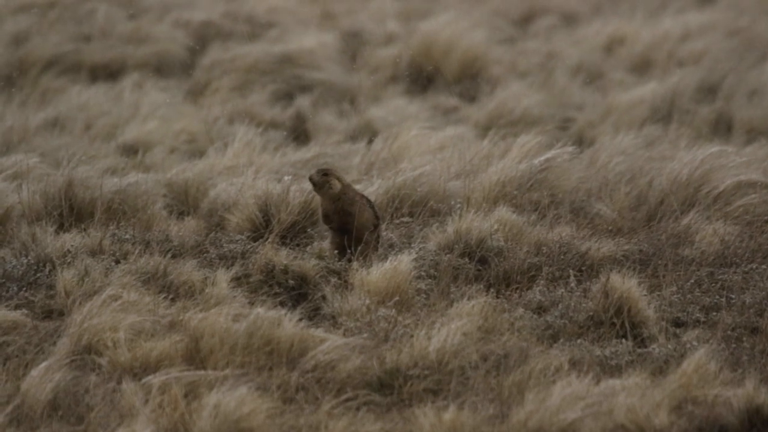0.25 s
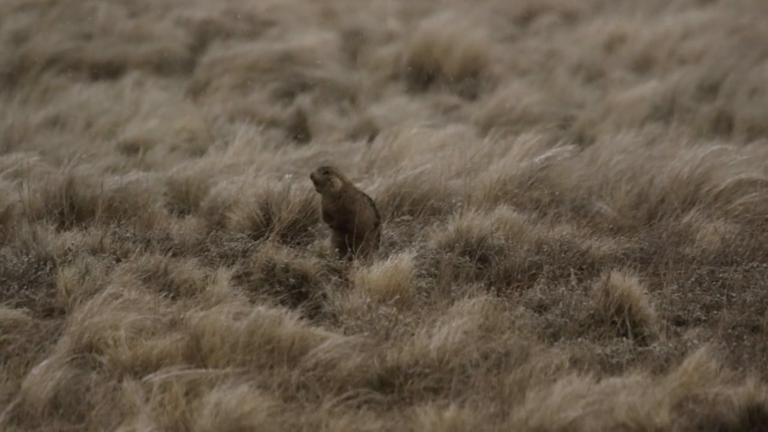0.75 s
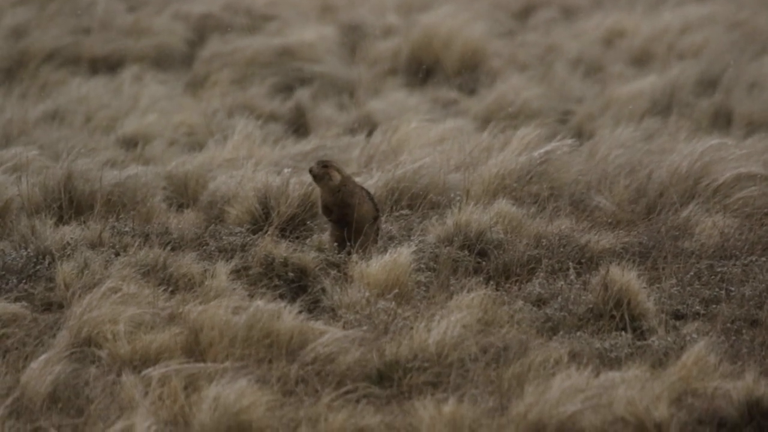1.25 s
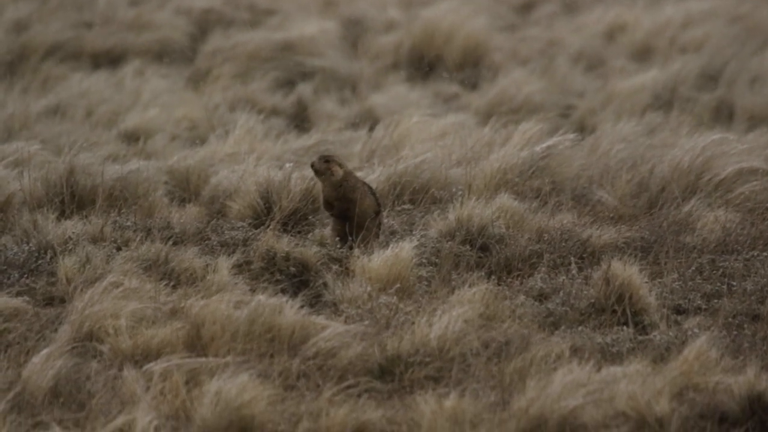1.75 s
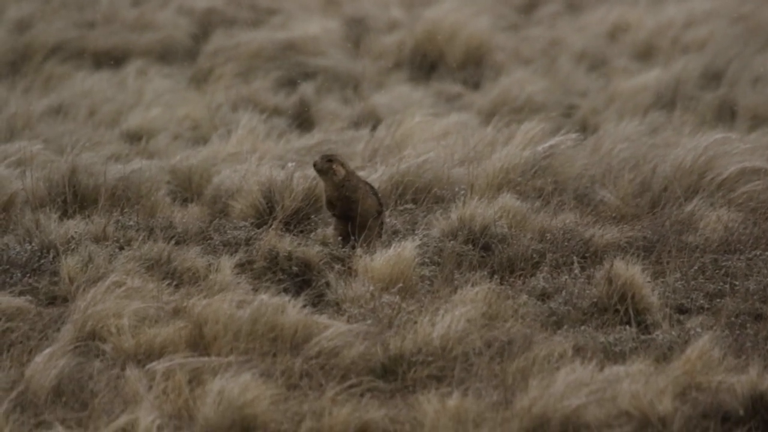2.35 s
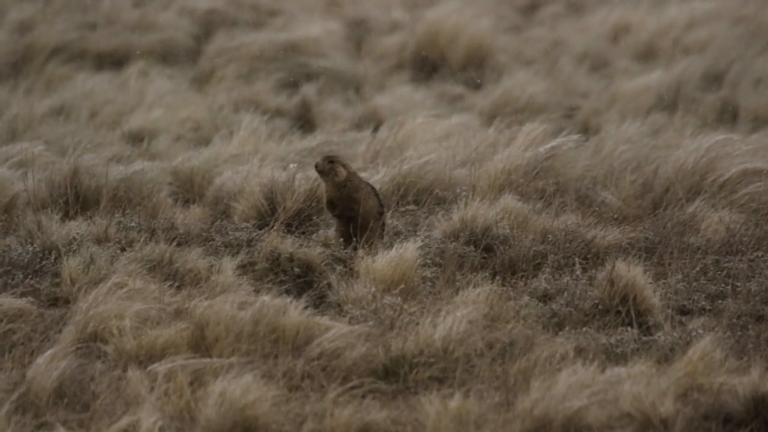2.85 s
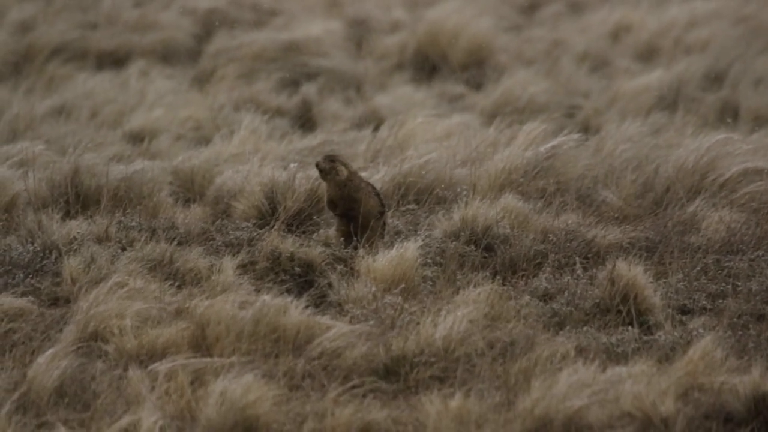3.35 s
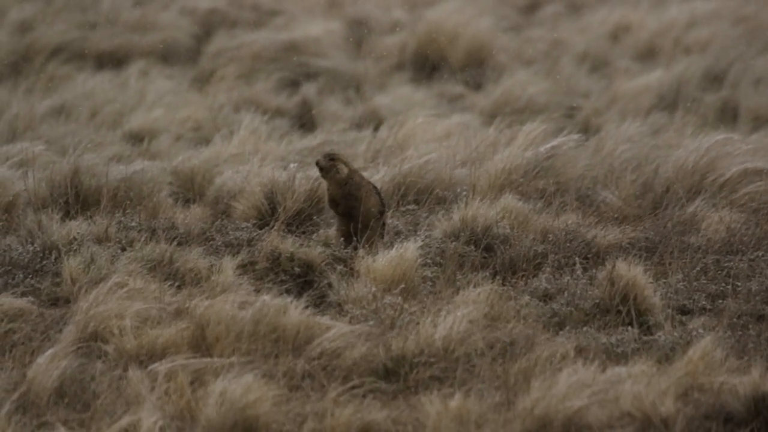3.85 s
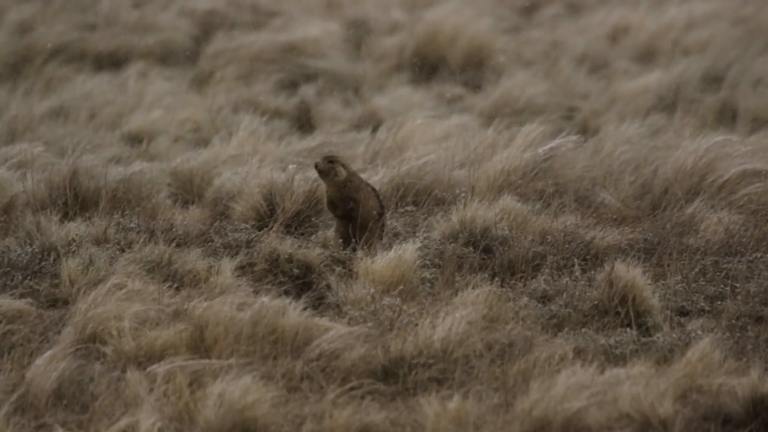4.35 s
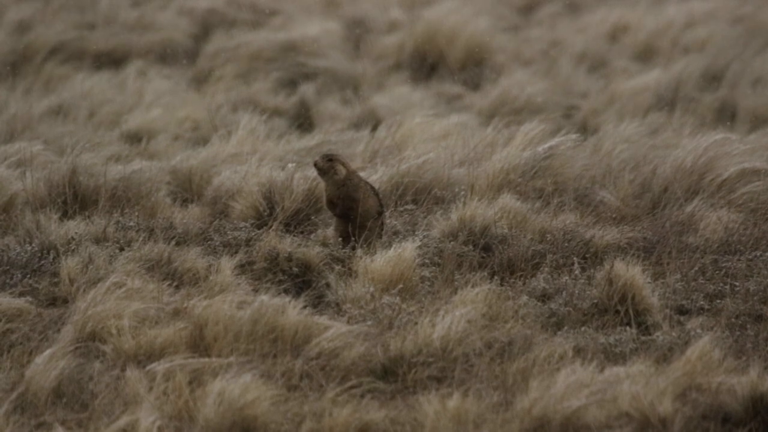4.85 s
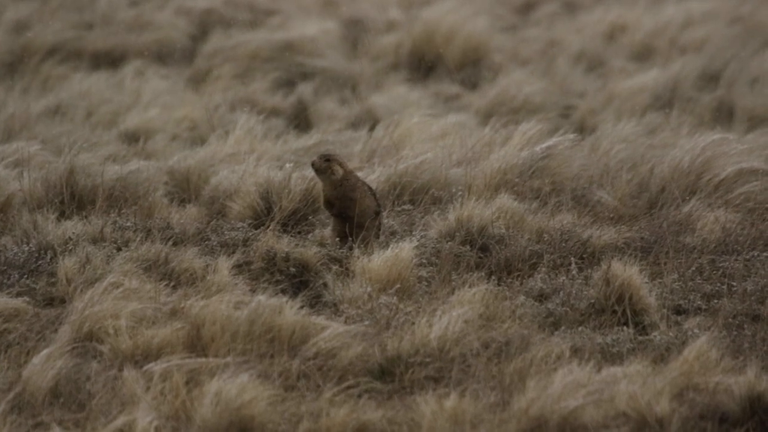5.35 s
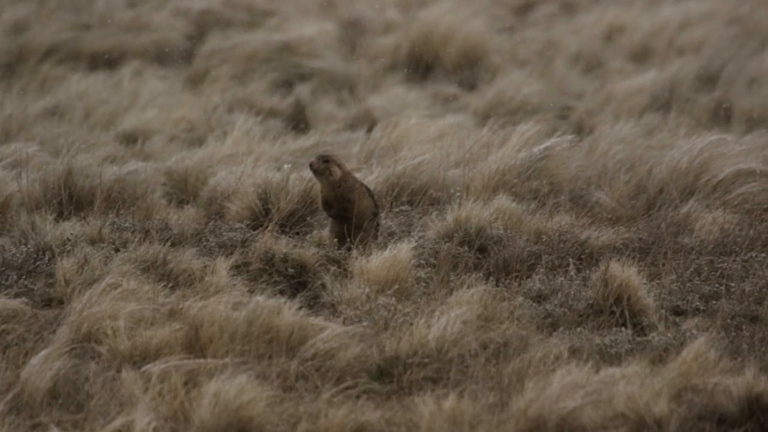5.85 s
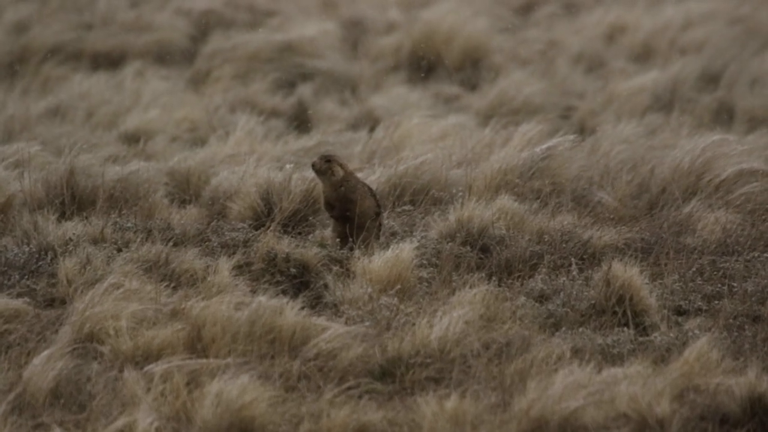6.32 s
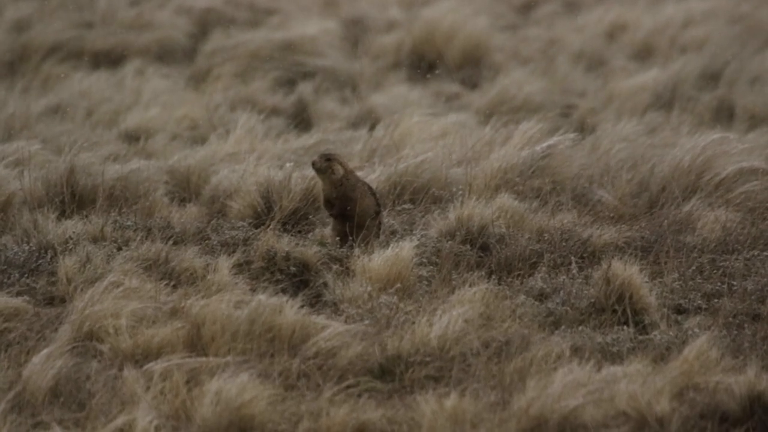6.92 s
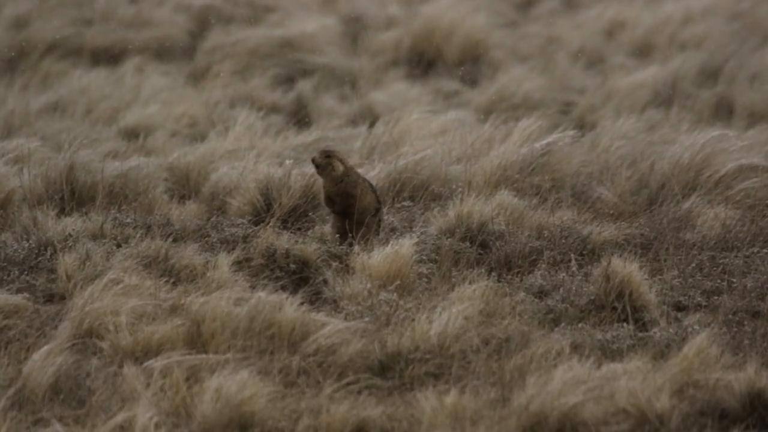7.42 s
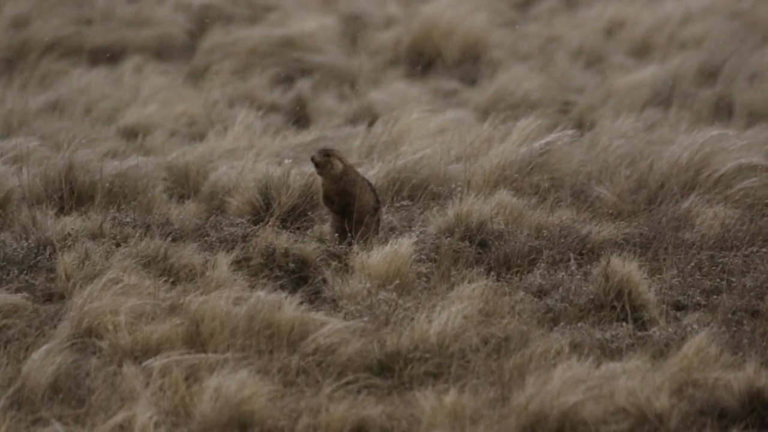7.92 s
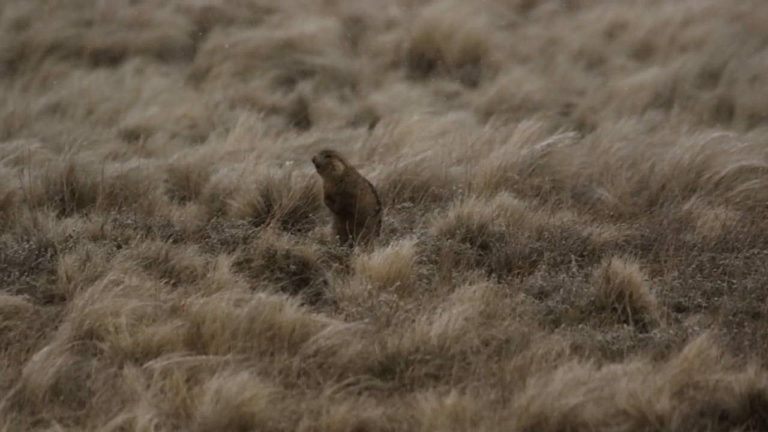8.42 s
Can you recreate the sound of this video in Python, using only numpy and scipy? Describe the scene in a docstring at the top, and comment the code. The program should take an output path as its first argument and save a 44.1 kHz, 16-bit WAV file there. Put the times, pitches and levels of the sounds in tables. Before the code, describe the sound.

Outdoor field microphone at some distance from a barking prairie dog. Each yip is bright and clipped, arching quickly up and down, with a short grassy scatter and a dull faint echo from far ground. Three bouts are split by calm gaps of air rush, weak wind thumps and distant low drone. Crisp straw crackle and snapping stems come mainly near the start, swelling after the first bout.

```python
"""Open grassland: a prairie dog barks in three bouts, each bark a short arch of pitch with a hard start.
Barks are sums of harmonics shaped by throat and mouth; the tussocks scatter them, far ground echoes them.
Nearby, stalks snap and dry grass crackles: short bursts of noise and coloured ticks, stronger in gusts.
Behind are light wind bumping the microphone and a rush of air (shaped noise), a faint whistle
at the start (a wavering sine tone), and the drone of a distant engine (narrow bands of noise)."""
import sys
import numpy as np
from scipy import signal
from scipy.fft import rfft, irfft, next_fast_len
from scipy.io import wavfile
from scipy.ndimage import uniform_filter1d, map_coordinates

SR = 44100
rng = np.random.default_rng(int(sys.argv[2]) if len(sys.argv) > 2 else 0)


def bounce(signal):
    """Save signal as a 16-bit WAV file at the path given by the first command-line argument."""
    frames = np.transpose(np.atleast_2d(signal))
    limited = np.clip(frames, -1, 1)
    pcm = np.round(limited * 32767).astype(np.int16)
    wavfile.write(sys.argv[1], SR, pcm)


N = 382788  # length of the scene [samples]


def amp(db):
    """Turn decibels into a plain multiplier."""
    return 10 ** (np.asarray(db) / 20)


def unit(x):
    """Scale a sound to an average (rms) strength of 1."""
    return x / np.sqrt(np.mean(x ** 2) + 1e-20)


def along(points, hz):
    """Read (frequency [Hz], value) points at any frequency, on a log axis."""
    point_hz, values = np.transpose(points)
    return np.interp(np.log(hz + 1), np.log(point_hz + 1), values)


def curve(rows):
    """Join (time [s], value) rows into one value per sample."""
    return np.interp(np.arange(N) / SR, *np.transpose(rows))


def wobble(rate, size=N):
    """A smooth random curve with the given number of random points a second."""
    knots = rng.standard_normal(int(size * rate / SR) + 4)
    return map_coordinates(knots, [np.arange(size) * rate / SR])


def filtered(x, response):
    """Multiply the frequencies of x by a response."""
    padded = next_fast_len(len(x) + 8192)
    gain = response(np.fft.rfftfreq(padded, 1 / SR))
    return irfft(rfft(x, padded) * gain, padded)[:len(x)]


def coloured(x, spectrum):
    """Shape x by a table of (frequency [Hz], level [dB])."""
    return filtered(x, lambda hz: amp(along(spectrum, hz)))


def noise(spectrum):
    """Random hiss of rms 1 with a given colour."""
    return unit(coloured(rng.standard_normal(N), spectrum))


def add(track, start, sound):
    """Mix a sound into the track at a start time [s]."""
    part = track[max(round(start * SR), 0):][:len(sound)]
    part += sound[:len(part)]


# every bark: (start [s], length [s], held pitch [Hz], attack level [dB], middle level [dB]),
# with levels before the throat and mouth colour it
BARKS = [(0.204, 0.094, 1006, -18, -24.5), (0.5432, 0.093, 1000, -19, -29), (0.8836, .094, 997, -19, -29.5),
         (1.225, 0.093, 978, -20, -25), (1.614, 0.087, 958, -20, -23.5), (3.499, 0.092, 992, -20, -26),
         (3.8844, 0.092, 1007, -20.5, -29.5), (4.2473, .095, 981, -21, -25.5),
         (4.6725, 0.087, 954, -23, -24.5), (5.0638, 0.085, 952, -22.5, -25),
         (7.2929, 0.097, 989, -19.5, -26.5), (7.686, .104, 1031, -19.5, -22.5),
         (8.0654, 0.1, 1023, -19, -24.5), (8.4226, 0.1, 1001, -19, -25)]


def prairie_dog():
    """All barks, scattered by the grass and followed by an echo from far ground."""
    track = np.zeros(N)
    for start, *shape in BARKS:
        add(track, start, scattered(bark(*shape)))
    return track + far_echo(track)


# the throat's fixed colour: (frequency [Hz], level [dB])
THROAT = [(700, -52), (1000, -39), (1500, -40), (1950, -15.5), (2500, -6.5), (4000, -5.3), (4600, -13.5),
          (5800, -18), (6750, -33), (8000, -24.5), (9000, -28), (10000, -41), (11200, -38), (14500, -51)]
# how much of the sag after the attack each region takes: (frequency [Hz], share [1 = all of it])
SAG_SHARE = [(2000, 0.6), (2900, 1.32), (4000, 1.31), (5200, 0.33), (8000, 0.19), (11000, 0.81)]
# the course of every bark: (share of its length [0 to 1], effort [dB],
# mouth resonance at the easy pitch [Hz])
GESTURE = [(0, -13.5, 2750), (.06, -6, 3100), (.14, -1.5, 3500), (.22, -1.5, 3060), (.32, -1, 2730),
           (.8, -2.5, 2910), (0.899, -7.5, 2620), (1, -11.5, 2170)]
SCOOP_S = .015  # time the pitch takes to scoop up [s]
# a bark pitched above the easy pitch sinks while held; one below it creeps up
EASY_HZ, DROOP_PER_HZ = 991, .0022
LATE_DB = -5  # the end of a bark against its attack [dB]
JAW_PER_HZ = 0.00067  # share by which the mouth resonance rises for each Hz above the easy pitch
BRIGHT_DB_PER_HZ = 0.0453  # lift above the mouth resonance for each Hz above the easy pitch [dB]


def bark(length, top_hz, attack_db, middle_db, scoop=.37, fall=0.49, fall_s=.011, release=0.0058,
         jitter=0.004, rasp_db=-19, mouth_db=7.0, mouth_hz=520, dulling=1.23, voice_db=0):
    """One bark: the pitch scoops up, holds and falls, sweeping its harmonics through the resonances."""
    end = length + release
    t = np.arange(int(end * SR)) / SR
    strain_hz = top_hz - EASY_HZ

    scoop_up = 1 - scoop * np.exp(-(t / SCOOP_S) ** 1.67)
    fall_off = 1 - fall * np.exp(-((end - t) / fall_s) ** 1.303)
    droop = 1 - DROOP_PER_HZ * strain_hz * (t / length) ** 2
    pitch = top_hz * scoop_up * fall_off * droop * (1 + jitter * wobble(517, size=len(t)))
    phase = 2 * np.pi * np.cumsum(pitch) / SR

    share, efforts, mouths = np.transpose(GESTURE)
    effort_db = np.interp(t / end, share, efforts)
    mouth = np.interp(t / end, share, mouths) * (1 + JAW_PER_HZ * strain_hz)
    # after the first push the voice moves to its middle level and then to its late one
    push_db = [attack_db, middle_db, middle_db, attack_db + LATE_DB]
    sag_db = np.interp(t / length, [.3, .4, .53, .7], push_db) - attack_db

    k = np.arange(1, 16)[:, None]  # harmonic numbers
    hz = k * pitch
    colour_db = along(THROAT, hz) + mouth_db * np.exp(-((hz - mouth) / mouth_hz) ** 2)
    colour_db += BRIGHT_DB_PER_HZ * strain_hz * (hz > mouth)
    # weak effort loses the harmonics far from the mouth resonance first
    octaves_away = np.minimum(np.abs(np.log2(hz / mouth)), .7)
    drive_db = effort_db * (.5 + dulling * octaves_away) + sag_db * along(SAG_SHARE, hz)
    shimmer_db = 1.8 * np.array([wobble(80, size=len(t)) for _ in k])
    # each harmonic starts at a random phase, so the bark's wave is less pulse-like
    start_phase = rng.uniform(0, 2 * np.pi, k.shape)
    harmonics = amp(colour_db + drive_db + shimmer_db) * np.sin(k * phase + start_phase)
    voice = np.sum(harmonics, axis=0)

    # air rasps through the folds once a cycle
    breath = rng.standard_normal(len(t)) * (1 + np.cos(phase))
    rasp = unit(coloured(breath, THROAT)) * amp(rasp_db + 0.55 * effort_db + sag_db)
    gate = np.clip(t / 0.0018, 0, 1) * np.clip((end - t) / 0.00092, 0, 1)  # hard start and stop
    return amp(attack_db + voice_db) * gate * (voice + rasp)


# how long the grass scatters sound: (frequency [Hz], time to fade by 60 dB [s])
TUSSOCKS = [(2500, 0.12), (5000, 0.12), (10000, 0.087)]


def scattered(x, wet_db=-9.5):
    """The direct sound plus a short, dense answer from the tussocks."""
    hz, t, grains = signal.stft(rng.standard_normal(SR // 4), SR, nperseg=128)
    build_up = 1 - np.exp(-t / .004)
    fade = amp(-60 * t / along(TUSSOCKS, hz)[:, None])
    tail = signal.istft(grains * fade * build_up, SR, nperseg=128)[1]
    path = amp(wet_db) * tail / np.linalg.norm(tail)
    path[0] += 1  # the direct sound
    return signal.fftconvolve(x, path)


# colour of the far echo: (frequency [Hz], level [dB])
FAR_GROUND = [(1500, -5), (2300, 15), (2900, 0.5), (3300, 6.5), (4200, -25), (9000, -40)]
# how well the wind carries the echo back: (time [s], level [dB])
CARRY = [(0, -21), (3.2, 4), (3.75, 6), (4.1, -10), (7, -19), (7.55, 2), (7.95, -10.5), (8.68, -12)]


def far_echo(x, echo_db=-34, blur=500):
    """Distant slopes return a dull copy, its pitch blurred by the moving air."""
    t = np.arange(SR // 2) / SR
    delay, spread = .22, .075  # [s]
    path = rng.standard_normal(len(t)) * np.exp(-((t - delay) / spread) ** 2 / 2)
    echo = signal.fftconvolve(x * wobble(blur), path / np.linalg.norm(path))[:N]
    return amp(echo_db + curve(CARRY)) * coloured(echo, FAR_GROUND)


# the loudest stalks snapping: (time [s], tick level [dB], body level [dB]), before the gains below
SNAPS = [(0.0518, -30, -48), (.409, -31.5, -53), (.4383, -33, -56), (0.4976, -27, -62), (1.0015, -33, -66),
         (1.6442, -50, -26), (1.8023, -31, -59), (1.91, -22, -46), (1.937, -26, -51), (2.0054, -30, -48),
         (2.0446, -32, -32.5), (2.213, -32, -42), (2.785, -40, -66), (5.414, -43, -46.5), (7.173, -57, -50)]
# colour of a snap's tick: (frequency [Hz], level [dB])
STALK = [(1000, -14), (4000, -5), (7000, 9.5), (11000, 6), (13000, -3), (15500, -14)]
# colour of thick stems, bending or crunching: (frequency [Hz], level [dB per Hz])
STEMS = [(450, -12), (900, -13.5), (1500, -2), (2500, -3), (5500, -8.5), (9000, -23)]
# lesser snaps: how many a second, tick level over the stirring grass [dB], lowest tick level [dB];
# both levels are before the random spread and the gains below
SMALL_SNAPS_PER_S, SMALL_SNAP_DB, CALM_SNAP_DB = 14, 13.5, -49.5


def snapping_stalks(tick_s=0.00039, tick_db=-2, body_s=0.0038, body_gain_db=9, small_body_db=-22,
                    spread_db=4):
    """A snap is a sharp tick and a short, lower crunch; lesser ones are random, louder in a gust."""
    ticks, bodies, t = np.zeros(N), np.zeros(N), np.arange(SR // 50) / SR
    chance, size = rng.random(N), rng.uniform(-0.88, 1, N)
    small_db = np.maximum(stirring_db() + SMALL_SNAP_DB, CALM_SNAP_DB) + spread_db * size
    small_at = np.flatnonzero(chance < SMALL_SNAPS_PER_S / SR)
    small = [(i / SR, small_db[i], small_db[i] + small_body_db) for i in small_at]
    for start, db, body_db in SNAPS + small:
        tick = np.exp(-t / tick_s) * rng.standard_normal(len(t))
        add(ticks, start, amp(db + tick_db) * tick)
        body = np.exp(-t / body_s) * rng.standard_normal(len(t))
        add(bodies, start, amp(body_db + body_gain_db) * body)
    return coloured(ticks, STALK) + coloured(bodies, STEMS)


# blades rubbing slowly: (frequency [Hz], level [dB per Hz])
STRAW = [(2000, -8.5), (4800, -13.5), (6800, -7), (10500, -10), (13000, -15), (15800, -34)]
# blades whipping past: (frequency [Hz], level [dB per Hz])
SWISH = [(4000, -15), (8000, -3.5), (10500, -1.5), (12500, -5.5), (14000, -14), (15800, -18)]


def dry_grass(blade_db=-5, blade_growth=0.69, swish_db=0, swish_growth=1.48, stem_db=-5):
    """Blades tick at a touch; a strong gust adds a denser, brighter swish and bends the thick stems."""
    blades = crackle(STRAW, rate=1300, spread_db=5, clump_db=3.5)
    swish = crackle(SWISH, rate=2600, spread_db=5, clump_db=3)
    stems = crackle(STEMS, rate=1300, spread_db=4, clump_db=2)
    motion_db = stirring_db()
    peak_db = motion_db.max()
    below_peak_db = motion_db - peak_db
    # growth above 1 means the layer fades faster than the motion does
    blades *= amp(blade_db + peak_db + blade_growth * below_peak_db)
    swish *= amp(swish_db + peak_db + swish_growth * below_peak_db)
    return blades + swish + amp(motion_db + stem_db) * stems


def crackle(spectrum, rate, spread_db, clump_db):
    """Tiny ticks (rate = ticks a second) of uneven size, swelling in clumps; rms 1."""
    sizes = amp(spread_db * np.minimum(rng.exponential(size=N), 3.6))
    ticks = (rng.random(N) < rate / SR) * rng.choice([-1, 1], N) * sizes
    clumps = amp(clump_db * np.clip(wobble(110), -2, 1.5))
    return unit(coloured(ticks * clumps, spectrum))


# gusts that stir the dry grass near the microphone: (time [s], level [dB], half length [s])
STIRS = [(0.043, -52.5, 0.059), (0.263, -52.5, 0.033), (0.464, -54, 0.087), (0.775, -62, 0.15),
         (1.566, -51.5, 0.096), (1.999, -43.5, 0.14), (2.314, -61, 0.044)]
STIR_SHAPE = 1.63  # 2 = a rounded swell, 1 = a pointed one


def stirring_db():
    """How hard the grass moves [dB]: each gust swells and dies away."""
    t = np.arange(N) / SR
    swells = sum(amp(db) * np.exp(-np.abs((t - middle) / half) ** STIR_SHAPE / 2)
                 for middle, db, half in STIRS)
    return 20 * np.log10(swells + 1e-6)


# puffs of wind on the microphone: (time [s], level [dB], half length [s]), level before the eddies
PUFFS = [(0.024, -41, 0.018), (0.274, -28.5, 0.012), (0.403, -38, 0.015), (.505, -30.5, 0.019),
         (1.427, -43.5, 0.054), (1.97, -41, 0.037), (2.607, -45, .013), (3.238, -51, .04),
         (4.71, -41, 0.033), (5.132, -34.5, 0.012), (5.979, -37.5, 0.055), (6.618, -30.5, 0.03),
         (7.081, -42, 0.018), (7.524, -33, 0.017), (8.633, -38, 0.014)]
# how the low rumble rises and falls: (time [s], level [dB]), before a small random wobble
BREEZE = [(0, -58), (.45, -49.5), (1, -58.5), (1.5, -48), (2.4, -62.5), (3.6, -58), (4.3, -55.5),
          (5.2, -52), (5.6, -67), (6.8, -62), (7.4, -55), (8.68, -63)]
# colour of puffs and rumble: (frequency [Hz], level [dB per Hz])
BUFFET = [(18, -18), (40, -2), (70, -1), (105, -1.5), (150, -8.5), (240, -22.5), (400, -29.5), (1200, -47),
          (12000, -60)]
# colour of the rush of air: (frequency [Hz], level [dB per Hz])
AIR = [(53, -44), (90, -17), (119, -19), (145, -8.5), (192, -4), (233, -13.5), (344, -9.5), (383, -4),
       (466, -10.5), (578, -9.5), (891, -20), (10900, -32), (15800, -35.5)]


def wind(rumble_db=0, air_db=-54):
    """A nearly steady rush over the plain, and eddies that bump and rumble on the microphone."""
    t = np.arange(N) / SR
    puffs = sum(amp(db) * np.exp(-((t - middle) / half) ** 2 / 2) for middle, db, half in PUFFS)
    eddies = noise(BUFFET)
    # even out the eddies so that each carries about the same push
    eddies /= np.sqrt(np.abs(uniform_filter1d(eddies ** 2, size=1500)) + 0.061)
    rumble = amp(curve(BREEZE) + rumble_db + 1.3 * wobble(8)) * noise(BUFFET)
    drift_db = .35 * wobble(2)
    rush = amp(air_db + drift_db) * noise(AIR)
    return puffs * eddies + rumble + rush


def far_whistle(pitch_hz=2420, level_db=-57):
    """A faint whistle, perhaps a distant bird: one sine tone with a slight waver."""
    start, length = .04, .14  # [s]
    t = np.arange(int(length * SR)) / SR
    pitch = pitch_hz * (1 + 0.0097 * wobble(143, size=len(t)))
    phase = 2 * np.pi * np.cumsum(pitch) / SR
    swell = np.sqrt(np.sin(np.pi * t / length))
    track = np.zeros(N)
    add(track, start, amp(level_db) * swell * np.sin(phase))
    return track


# low tones of the distant engine: (frequency [Hz], width [Hz], level [dB])
DRONE = [(113.6, 21, -60), (192.3, 19.8, -55), (307, 28, -58.5), (385, 34, -58.5)]


def far_engine():
    """Low engine tones, blurred into bands of noise by the long path through moving air."""
    def band(centre, width):
        """Noise gathered around one frequency; rms 1."""
        hiss = rng.standard_normal(N)
        return unit(filtered(hiss, lambda hz: 1 / (1 + ((hz - centre) / width * 1.25) ** 2)))
    return sum(amp(db) * band(hz, width) for hz, width, db in DRONE)


def scene():
    """The animal in front of grass, wind and distance."""
    near = prairie_dog() + snapping_stalks() + dry_grass()
    return (near + wind() + far_whistle() + far_engine())[None]


TOP_HZ = 15850  # band limit [Hz]


def record(dry):
    """The recorder keeps nothing at or above its band limit."""
    return filtered(dry[0], lambda hz: hz < TOP_HZ)[None]


dry = scene()
out = record(dry)
bounce(out)
```